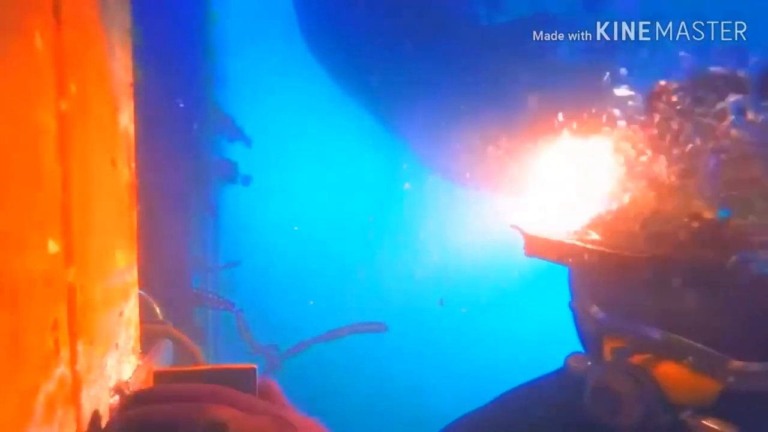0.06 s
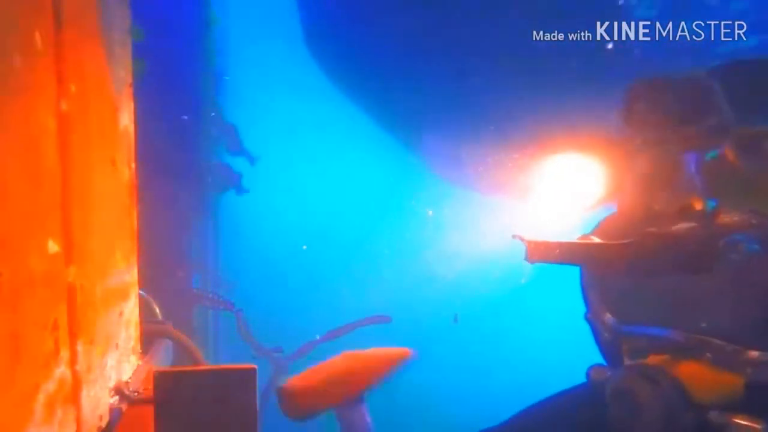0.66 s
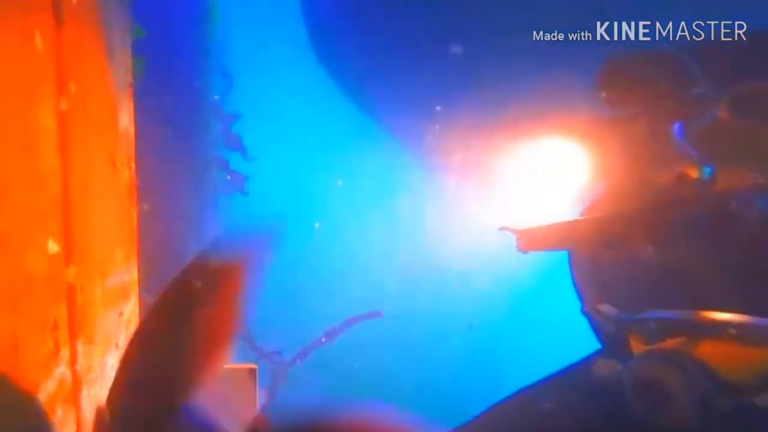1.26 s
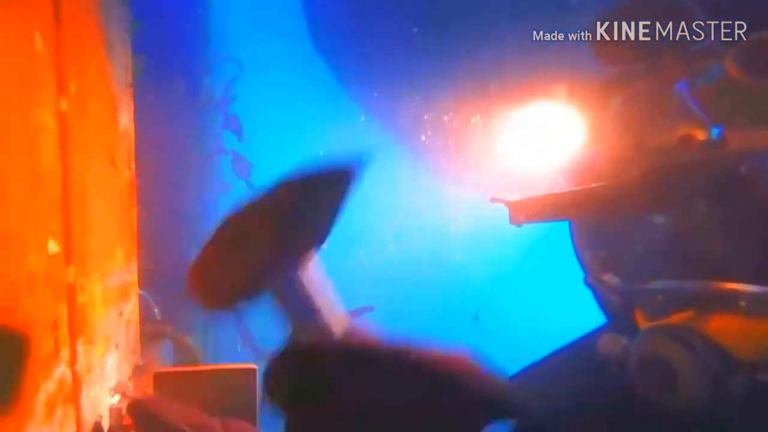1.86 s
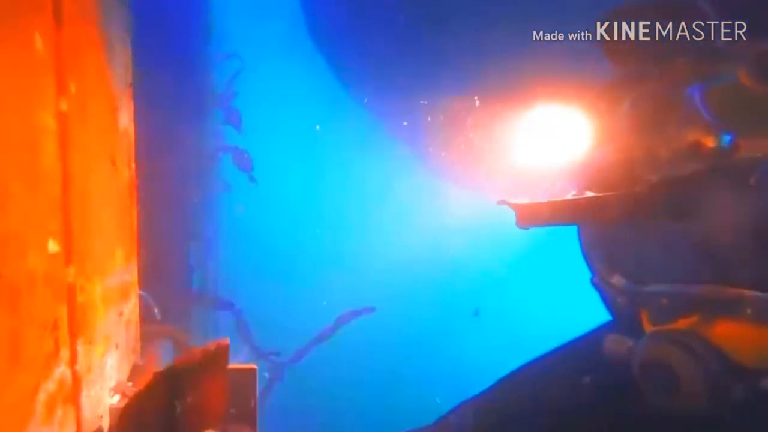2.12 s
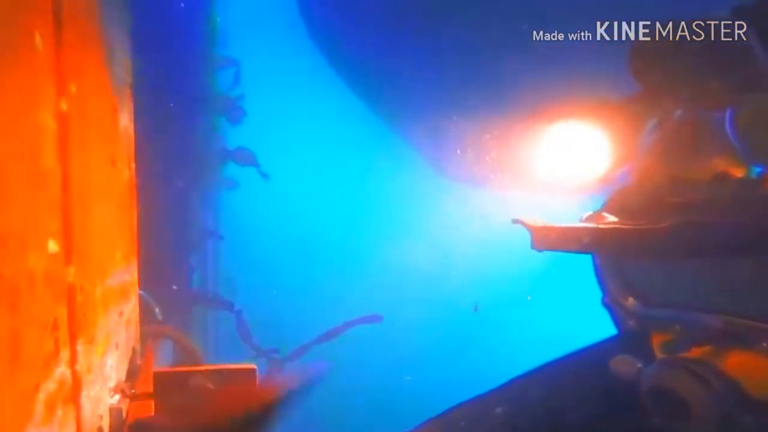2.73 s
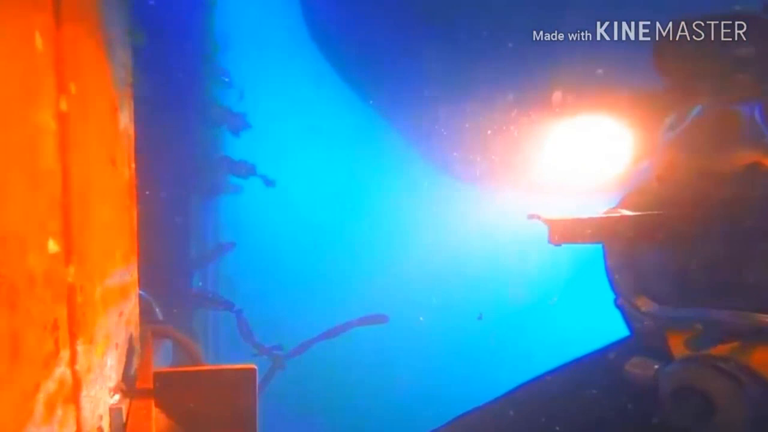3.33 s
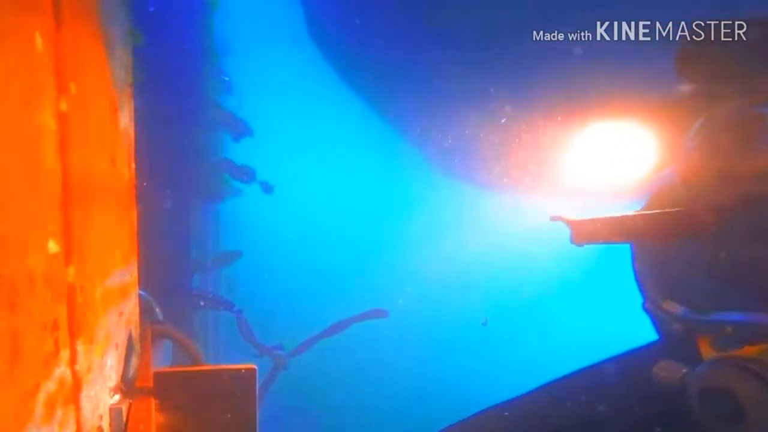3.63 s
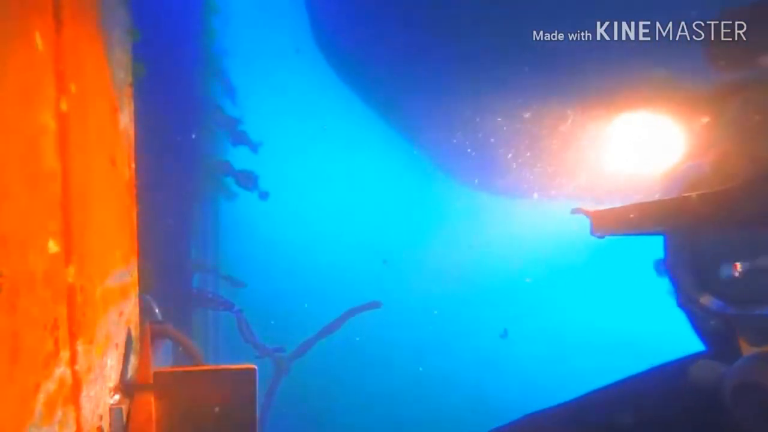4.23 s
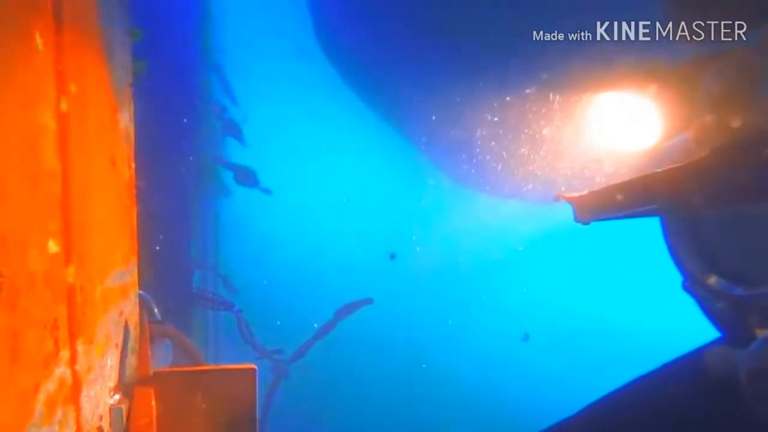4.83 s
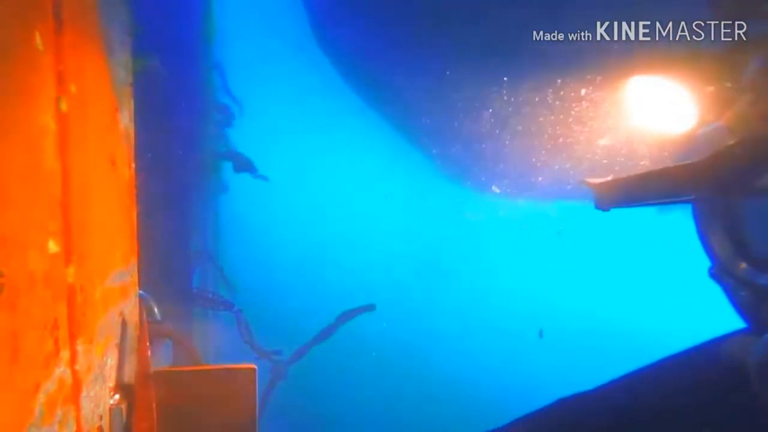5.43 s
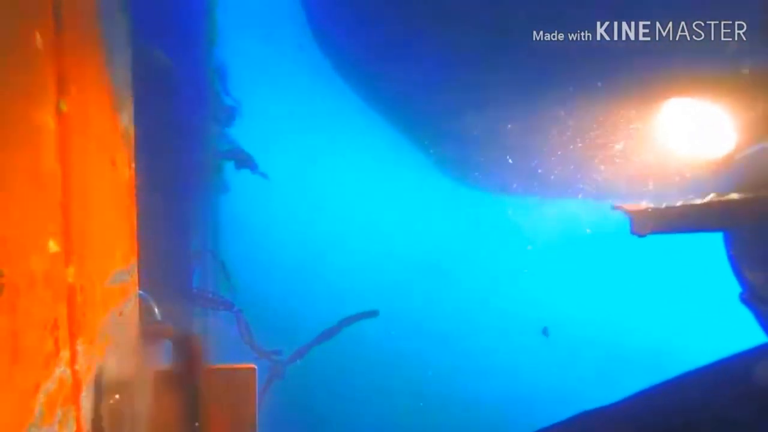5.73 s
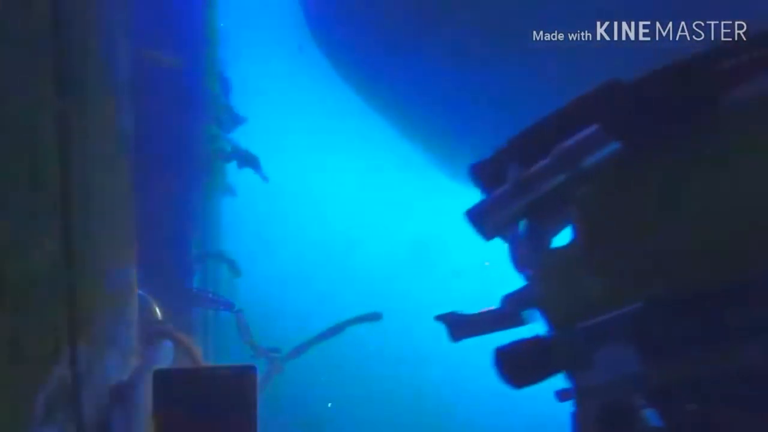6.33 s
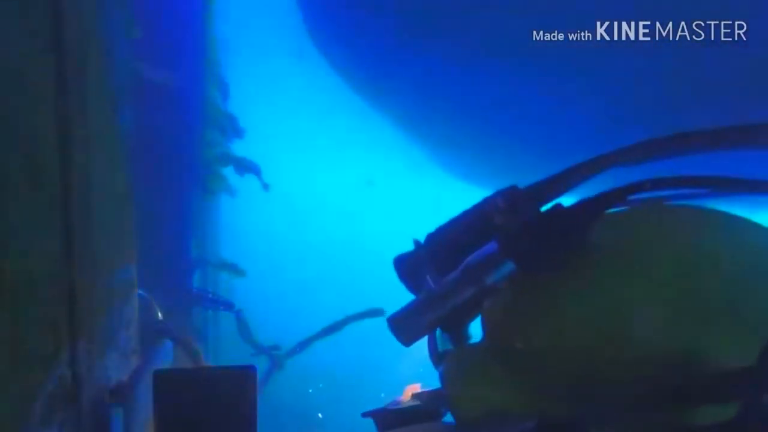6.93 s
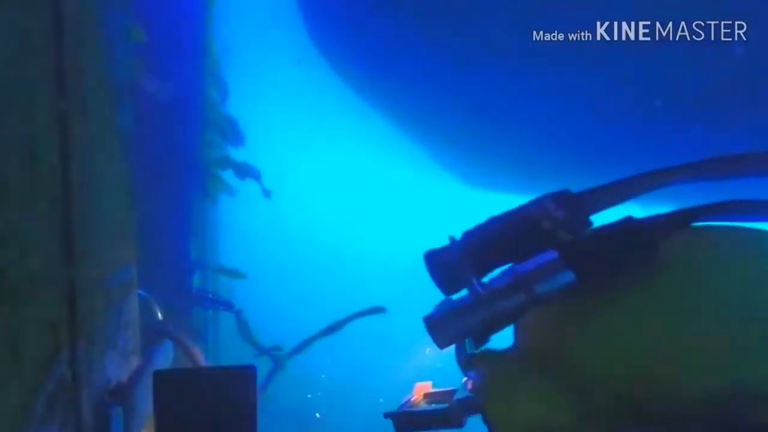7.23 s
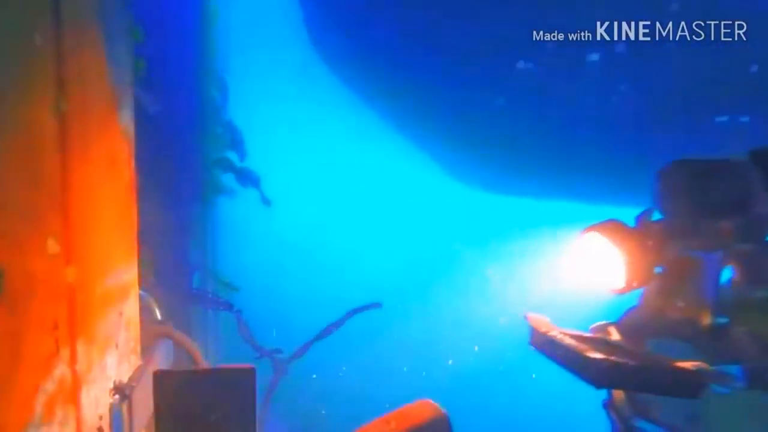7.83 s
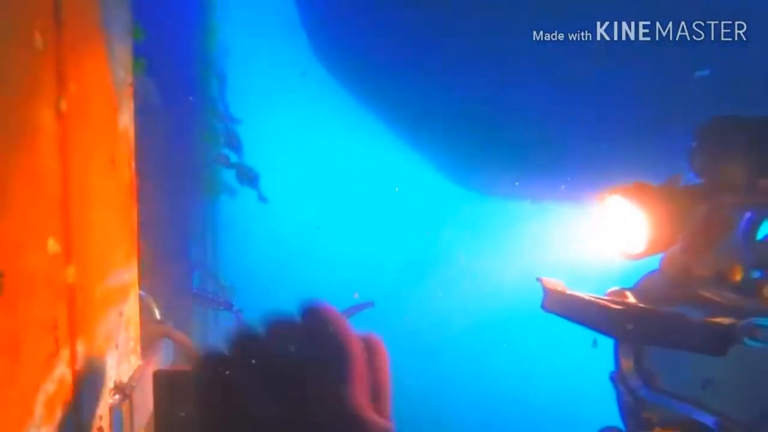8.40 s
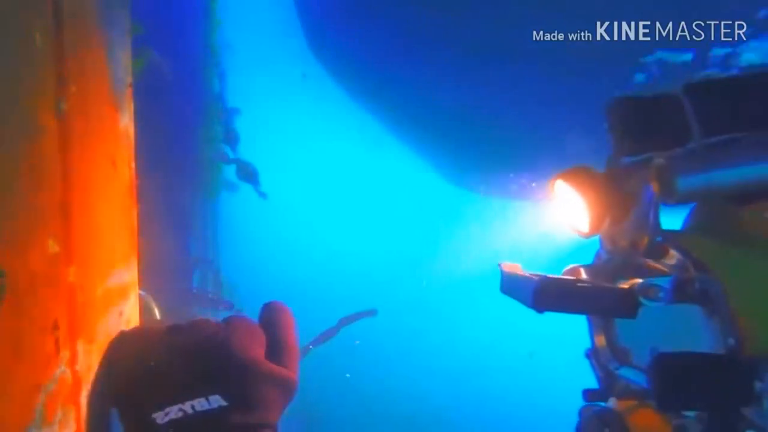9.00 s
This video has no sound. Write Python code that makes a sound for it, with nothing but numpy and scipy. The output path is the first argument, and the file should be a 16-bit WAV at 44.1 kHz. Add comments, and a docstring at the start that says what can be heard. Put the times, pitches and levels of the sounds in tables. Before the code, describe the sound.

A steady run of twelve hard hammer blows on steel cracks through the water, following an opening rush of bubbles and a light clunk. The blows overload a microphone inside a housing and push down the background of gurgling and engine hum. When the hammering stops, single bubbles and small wet spurts come forward, then another gush of gas and the clank of a steel tool bouncing on a bench.

```python
"""Gas gushes out under water beside a welder: its bubbles ring, gurgle and fizz, then die away.
A generator hums through the water. A tool clunks, and a hammer strikes steel twelve times, now and
then rebounding. Later come two thin squeaks, and a steel tool is dropped on the bench.
All is heard through a camera housing. Hard blows overload the input and pull the gain (the volume
setting) down, and it creeps back up."""
import sys
import numpy as np
from scipy import signal
from scipy.fft import rfft, irfft, next_fast_len
from scipy.io import wavfile

SR = 44100
rng = np.random.default_rng(int(sys.argv[2]) if len(sys.argv) > 2 else 0)


def unload_wav(signal):
    """Save mono or channel-first audio to the path in sys.argv[1] as 16-bit WAV at rate SR, clipped to [-1, 1]."""
    wavfile.write(
        sys.argv[1],
        SR,
        np.round(np.clip(np.atleast_2d(signal).T, -1, 1) * 32767).astype(np.int16),
    )


N = 399546
TIME = np.arange(N) / SR

# Gushes of gas. Each row: start in seconds, hold in seconds, relative levels of churn, gurgle and fizz
# in dB, fading of the fizz in dB per second.
GAS_GUSHES = [(-.15,0.093,-27.5,-30,-50,21),(0.805,.3,-58,-45,-60,21.5),(1.72,.35,-58.5,-54.5,-56,41),(4.021,.2,-21.5,-28,-50,6),(5.926,0.06,-72,-45.5,-58,4.5),(6.452,0.16,-55,-43.5,-75.5,12.5),(7.837,.2,-27,-35,-53.5,10.5)]
# The loudest single bubbles, and two low thumps near hammer blows (at 3.96 s and 5.619 s). Each row: start in
# seconds, pitch in Hz, level in dB, glide in octaves per second.
GLUGS_AND_THUMPS = [(.104,678,-15.5,1.5),(.111,464,-17,-0.5),(.135,818,-15.5,2.5),(.191,460,-16.5,4),(.548,242.6,-14.5,0.5),(.775,820,-27.5,2),(.856,760,-22,1.5),(1.21,341,-20.5,3),(1.648,424,-23,0),(2.474,805,-25.5,-3),(3.96,41.76,-11.5,2.5),(4.01,124.4,-15,7.5),(4.048,109.8,-20.5,7),(4.248,89.2,-9,3.5),(4.3,377,-18.5,-1.5),(4.99,156,-6,3),(5.002,220,-11,7.5),(5.379,238,-18.5,4.5),(5.486,259,-22.5,3.5),(5.619,191.4,-9,1),(6.319,820,-22.5,4),(6.352,730,-23,5),(6.516,259,-27,3),(6.59,617,-25,-0.5),(6.61,707,-21.5,5),(6.74,732,-24.5,4.5),(6.835,264,-17.5,3.5),(6.835,679,-15,1),(7.103,537,-31.5,0.5),(7.586,584,-24,4.5),(7.97,113,-9.5,3.5),(7.982,707,-22.5,1.5),(8.05,124.6,-6.5,6),(8.13,178,-13.5,3),(8.135,849,-14.5,4.5),(8.137,103,-7,1),(8.222,788,-19.5,0),(8.223,575,-27,1),(8.325,556,-23.5,-4),(8.531,857,-20,0),(8.603,544,-14,0.5),(8.907,768,-12,5.5),(8.909,459,-9,3.5)]
# The generator's tones. Each row: multiple of its turning rate, relative level in dB.
ENGINE_TONES = [(1,-8),(2,-4),(3,-5),(4,-1),(5,-17.5),(6,-11.5),(7,-15.5),(8,-21),(9,-28.5),(10,-24)]
# The whine of the electronics. Each row: pitch in Hz, level in dB.
WHINE_TONES = [(6199,-82.5),(9298,-82),(12398,-76),(15473,-77)]
# A tool bounces as it is taken up. Each row: start in seconds, then force, hardness and ring in dB.
TOOL_CLUNKS = [(0.3881,-4,-5,-2),(0.4614,-13.5,-8,-3.5)]
# Spurts of gas. Each row: start in seconds, middle pitch in Hz, bubble level in dB, splash level in dB.
GAS_SPURTS = [(1.387,3630,-44,-47),(2.187,2100,-42,-46),(2.804,1720,-49.5,-54),(3.209,1590,-55,-56),(4.271,1584,-30,-41),(4.584,1540,-35.5,-49),(4.611,4280,-45,-59.5),(6.023,3627,-55,-35),(6.06,2800,-63,-40),(6.125,4350,-30,-33),(6.166,4360,-42,-38),(6.276,3794,-44,-36.5),(6.512,1603,-43,-41),(6.55,2530,-58,-43),(7.585,2740,-40.5,-55),(7.915,1560,-45,-44),(7.976,3040,-49.5,-44.5),(8.003,2900,-46,-42),(8.047,4240,-43,-39.5),(8.097,1710,-43.5,-47),(8.134,1500,-40.5,-42),(8.145,4070,-42.5,-47),(8.22,1570,-41,-60),(8.285,2700,-36,-44),(8.305,2550,-38.5,-52),(8.324,3500,-48.5,-46.5),(8.401,4340,-42.5,-47.5),(8.452,4340,-46.5,-53),(8.575,2900,-48,-46.5),(8.603,1610,-35,-47),(8.611,3000,-50,-49)]
# Hammer on steel. Each row: start in seconds, then force, hardness and plate ring in dB, and the dB
# by which the spot that is hit favours every other tone.
HAMMER_BLOWS = [(1.4405,1.5,2.5,-26.5,-1),(1.8448,12,3,-19.5,3),(2.2321,13.5,1.5,-21.5,0),(2.5986,14.5,-15,-15.5,1.5),(2.9619,16,-6,-19,-3),(3.315,16.5,-7,-16.5,0.5),(3.672,12.5,3,-23.5,4),(4.0737,14,-2.5,-23,2.5),(4.4361,13,0.5,-27.5,0.5),(4.8471,14.5,-4,-27.5,-1),(5.2332,16,-4.5,-22.5,-1),(5.6163,14,-14.5,-23.5,1)]
# The hammer falls back. Each row: start in seconds, force in dB, ring of the shaken bubbles in dB, ring pitch
# in Hz.
HAMMER_REBOUNDS = [(2.606,-8,-0.5,2090),(3.347,-16.5,-14,1597),(3.378,-20,-21,1560),(3.7015,-1,-14,1830),(4.093,1.5,-10.5,1935)]
# A steel tool hits the bench. Each row: start in seconds, then force, hardness and tool ring in dB,
# share of the ring time, pitch ratio, plate ring in dB.
BENCH_KNOCKS = [(6.318,-15,-13,-62,0.23,1,-48),(8.532,-18,-28.5,-50,0.32,0.97,-49.5),(8.653,4,-4.5,0,0.99,1.023,-24),(8.7897,11.5,-3.5,1,0.22,0.96,-19.5),(8.8275,6,-34,-7.5,0.63,1.04,-22),(8.843,0.5,-36.5,-25,.3,1.04,-33)]
# Squeaks. Each row: start in seconds, starting pitch in Hz, level in dB.
THIN_SQUEAKS = [(7.35,2330,-56.5),(7.39,1830,-50.5)]
# The tones in a squeak. Each row: multiple of the pitch, relative level in dB.
SQUEAK_TONES = [(1,0),(1.42,-3),(1.78,-8)]

# Modes are the tones a thing rings with when hit. Each row: pitch in Hz, relative level in dB,
# ring time in seconds (t60, the time to fade by 60 dB).
HANDLE_MODES = [(254,-6,0.17),(514,-13.5,0.066),(818,-5,0.14),(1710,-20.5,0.066),(2030,-15.5,0.069),(2902,4.5,0.035)]
HOUSING_MODES = [(174,-13.5,0.086),(660,-29,0.0018),(820,-2.5,0.021),(1663,-10,0.023),(2390,-28,0.018),(2764,-6,0.0095),(2990,-9,0.013),(4250,-10.5,0.0069),(6340,-26.5,0.0073),(8100,-19,0.0043),(10580,-20.5,0.008)]
PLATE_MODES = [(368,-10,0.24),(484,-8,0.28),(617,-28.5,1),(739,-2.5,.42),(841,0.5,0.27),(815,-8,0.22),(1500,-12.5,.06),(1990,-2,0.056)]
TOOL_MODES = [(175.3,-0.5,0.36),(486,-13.5,0.66),(664,-10.5,0.16),(952,-14,0.11),(1466,-9.5,0.12),(1880,-16,.06),(2014,-6.5,0.14),(2280,-10,.06),(2740,-8,0.066),(3080,-11,.06),(4680,-25,.05)]
# The tones of bubbles shaken loose by a blow. Each row: multiple of the ring pitch, relative level in dB, ring
# time in seconds.
SHAKEN_MODES = [(.75,-14,0.051),(.91,-15,.055),(1,-2,0.064),(1.04,-8,0.032),(1.12,-13.5,.06),(1.25,-13.5,0.056),(1.6,-27,.06)]

# A colour says how strong a sound is from bass to treble. Each row: frequency in Hz, relative level in dB.
CHURN_COLOUR = [(15,-17),(28,-1.5),(60,0),(100,8.5),(150,-1),(220,-19),(330,-22.5),(600,-86),(3000,-90.5)]  # big gas pockets
GURGLE_COLOUR = [(120,-13),(250,-6),(380,-8),(600,-3),(840,0),(950,-12),(1100,-30),(1400,-27.5),(5000,-55.5),(15000,-80.5)]  # middling bubbles
FIZZ_COLOUR = [(700,-10),(1000,-3),(1300,-10),(1620,1),(2100,-4),(2750,1),(3600,-6),(4300,-4),(4900,-21),(8000,-26),(12000,-31),(15000,-48)]  # tiny bubbles
HISS_COLOUR = [(300,0),(2000,4),(4000,6),(6300,3),(8000,-1),(12000,-3),(14000,-13),(16000,-26)]  # the electronics
CRACKLE_COLOUR = [(1000,-9.5),(4000,5),(10500,-2),(13000,-4),(16000,-10)]  # crackle after a shock
WASH_COLOUR = [(80,-8),(300,1.5),(800,10),(1200,-6),(1700,-1),(2400,-2.5),(3700,-18.5),(4700,-25),(9000,-39.5),(15000,-51.5)]  # shaken water
ECHO_COLOUR = [(400,-7.5),(800,0.5),(1200,-8.5),(1650,0.5),(2200,-2),(2900,-3),(3800,-13.5),(4800,-24),(9000,-33),(15000,-55)]  # echoes off the walls
RUMBLE_COLOUR = [(70,-12.5),(170,0),(260,3),(380,-3),(520,-3),(900,-19),(2000,-43.5),(6000,-74),(15000,-100)]  # the basin after a blow
SPLASH_COLOUR = [(400,-4),(850,6),(1250,-7),(1620,3),(2100,-2),(2750,1),(3600,-5),(4400,-4),(4900,-22),(8000,-23),(11500,-22),(15000,-40)]  # a spurt's splash


def from_db(db):
    """Turn decibels into a number to multiply by."""
    return 10 ** (np.asarray(db) / 20)


def rms_one(x):
    """Scale a sound to an average power of 1."""
    return x / np.sqrt(np.mean(x ** 2) + 1e-20)


def add(out, start_s, sound):
    """Mix a sound in at its start time."""
    at = int(np.clip(round(start_s * SR), 0, len(out) - 1))
    out[at:at + len(sound)] += sound[:len(out) - at]


def colour(x, points):
    """Shape the bass and treble of a sound; its power comes out as 1."""
    hz, db = np.transpose(points)
    bins = np.maximum(np.fft.rfftfreq(len(x), 1 / SR), 1)
    gains = from_db(np.interp(np.log(bins), np.log(hz), db))
    return rms_one(irfft(rfft(x) * gains, len(x)))


def noise(points):
    """Steady noise of the given colour."""
    return colour(rng.standard_normal(next_fast_len(N)), points)[:N]


def drift(per_s, length=N):
    """A random wander of about 1 either way, turning per_s times a second."""
    return np.interp(TIME[:length] * per_s, np.arange(4096), rng.standard_normal(4096))


def flow(levels_db, fade_db_per_s, trickle_db):
    """Strength of the gas: each gush swells, holds and dies away over a trickle, all surging a little."""
    attack_s = .062
    power = from_db(trickle_db) ** 2
    fades = np.broadcast_to(fade_db_per_s, len(GAS_GUSHES))
    for (start, hold, *_), db, fade in zip(GAS_GUSHES, levels_db, fades):
        swell = np.clip((TIME - start) / attack_s, 0, 1)
        fading_s = np.maximum(TIME - start - attack_s - hold, 0)
        power = power + (swell * from_db(db - fade * fading_s)) ** 2
    return np.sqrt(power) * from_db(3.5 * drift(per_s=9))


def bubble(hz, t60, rise, swell=.97):
    """Gas pinches off over about `swell` cycles, rings, and glides by `rise` octaves a second."""
    t = TIME[:int(t60 * SR) + 2]
    phase = 2 * np.pi * np.cumsum(hz * 2 ** (rise * t)) / SR
    return np.sin(phase) * from_db(-60 * t / t60) * (1 - np.exp(-2 * t * hz / swell))


def swarm(count, low_hz, high_hz, cycles, spread_db, climb):
    """Bubbles of random size and timing; on average each rises `climb` octaves while it lasts."""
    out = np.zeros(next_fast_len(N))
    for when, size, strength, life, speed in rng.random((count, 5)):
        hz = low_hz * (high_hz / low_hz) ** size
        t60 = cycles * (.5 + life) / hz
        level = from_db(spread_db * min(-np.log(strength + 1e-9), 3.5))
        add(out, when * N / SR, level * bubble(hz, t60, rise=2 * speed * climb / t60))
    return out


def pops(fizz):
    """Gas pockets snap open, more often and more loudly as the fizz grows."""
    out = np.zeros(N)
    pops_per_s = 55 * fizz / from_db(-52)
    starts = np.flatnonzero(rng.random(N) < pops_per_s / SR)
    for at, (size, weakness) in zip(starts, rng.random((len(starts), 2))):
        snap = sum(bubble(hz * 2.4 ** size, t60=.018, rise=0, swell=3) for hz in (1400, 1600, 1800))
        add(out, at / SR, fizz[at] * from_db(12 - 10 * weakness) * snap)
    return out


def gas():
    """Big pockets churn and fade quickly, middling bubbles gurgle, tiny ones fizz and snap."""
    _, _, churn_db, gurgle_db, fizz_db, fizz_fade = np.transpose(GAS_GUSHES)
    churn = flow(churn_db, fade_db_per_s=36, trickle_db=-39)
    gurgle = flow(gurgle_db, fade_db_per_s=11.5, trickle_db=-51)
    far_fizz = flow(fizz_db, fizz_fade, trickle_db=-59.5)
    near_fizz = flow(fizz_db, fizz_fade, trickle_db=-69)
    middling = swarm(count=2800, low_hz=170, high_hz=1100, cycles=32, spread_db=4, climb=.12)
    tiny = swarm(count=2600, low_hz=1000, high_hz=4800, cycles=40, spread_db=5.5, climb=.04)
    out = churn * from_db(-3.5) * noise(CHURN_COLOUR)
    # Near bubbles are heard one by one; far ones merge into a rush of noise.
    out += gurgle * from_db(-1) * (colour(middling, GURGLE_COLOUR)[:N] + .55 * noise(GURGLE_COLOUR))
    flutter = from_db(3 * drift(per_s=30))
    out += near_fizz * flutter * from_db(-3.5) * colour(tiny, FIZZ_COLOUR)[:N]
    out += far_fizz * from_db(-8) * noise(FIZZ_COLOUR)
    return out + pops(near_fizz)


def generator():
    """The hum of a slightly unsteady engine carries through the water."""
    turns_per_s = 25.66 * (1 + .0057 * drift(per_s=5.8))
    turns = np.cumsum(turns_per_s) / SR
    hum = np.zeros(N)
    for multiple, db in ENGINE_TONES:
        level = from_db(db + 1.2 * drift(per_s=13))
        hum += level * np.sin(2 * np.pi * (multiple * turns + rng.random()))
    return np.sqrt(2) * from_db(-36.5) * hum


def electronics():
    """The microphone input adds a faint hiss and a thin, unsteady whine."""
    whine = sum(from_db(db) * np.sin(2 * np.pi * hz * TIME + .9 * drift(per_s=300))
                for hz, db in WHINE_TONES)
    return np.sqrt(2) * whine + from_db(-70) * noise(HISS_COLOUR)


def glugs():
    """Loud single bubbles, and two low thumps near hammer blows: lower ones ring longer, and each wobbles as it
    glides."""
    out = np.zeros(N)
    for start, hz, db, glide in GLUGS_AND_THUMPS:
        size = 500 / hz
        glug = bubble(hz, t60=.12 * size ** .49, rise=glide, swell=3.4)
        wobble_db = 2.2 * drift(per_s=160, length=len(glug))
        add(out, start, from_db(db + wobble_db) * glug)
    return out


def ring(x, hz, t60):
    """One mode: each click in x sets off a pure tone that dies away."""
    decay, angle = from_db(-60 / (t60 * SR)), 2 * np.pi * hz / SR
    return signal.lfilter([0, np.sin(angle)], [1, -2 * decay * np.cos(angle), decay ** 2], x + 1e-18)


def struck(modes, ring_db, swell_s, spot_db=0, pitch=1, lasts=1):
    """Steel rings; the spot hit favours odd or even modes, and the restless water makes each waver."""
    t = TIME[:SR]
    click, out = 1.0 * (t == 0), 0
    for k, (hz, db, t60) in enumerate(modes):
        waver_db = 2.2 * drift(per_s=45, length=SR)
        level_db = ring_db + db + spot_db * (-1) ** k + rng.standard_normal()
        out = out + from_db(level_db + waver_db) * ring(click, hz * pitch, t60 * lasts)
    return out * (1 - np.exp(-(t / swell_s) ** 2))


def housing(shock, hard_db):
    """A shock rings the camera housing; a hard hit favours its stiff modes, differently each time."""
    out = 0
    for (hz, db, t60), chance in zip(HOUSING_MODES, rng.standard_normal(len(HOUSING_MODES))):
        stiff = np.exp(-np.log(hz / 2900) ** 2 / .3)
        level = from_db(db + stiff * (hard_db + 2.5 * chance))
        out = out + level * ring(shock, hz * np.exp(.045 * stiff * chance), t60)
    return out


def backwash(t):
    """After a shock the water hisses briefly, and the bubbles shaken loose rattle."""
    hiss = rng.standard_normal(len(t)) * swell_and_fade(t, swell_s=.0006, fade_s=.012)
    rattle = np.zeros(len(t))
    for size, when in rng.random((12, 2)):
        add(rattle, .012 * when ** 2, bubble(1300 * 3 ** size, t60=.045, rise=.5))
    fade_out = np.cos(np.pi / 2 * t / t[-1]) ** 2
    return colour(rms_one(hiss) + .9 * rms_one(rattle), WASH_COLOUR) * fade_out


def swell_and_fade(t, swell_s, fade_s):
    """The loudness of a short burst: a quick rise, then a slower fall."""
    return (1 - np.exp(-t / swell_s)) * np.exp(-t / fade_s)


def echoes(per_s=320):
    """A shock comes back off the walls as a rough patter."""
    t = TIME[:SR // 3]
    patter = rng.standard_normal(len(t)) * (rng.random(len(t)) < per_s / SR)
    return colour(patter, ECHO_COLOUR) * swell_and_fade(t, swell_s=.004, fade_s=.024)


def rumble():
    """After a blow the bass lingers between the walls of the basin."""
    t = TIME[:SR // 2]
    bass = colour(rng.standard_normal(len(t)), RUMBLE_COLOUR)
    return bass * swell_and_fade(t, swell_s=.012, fade_s=.05)


def strikes(blows, bass_hz, contact_hz, crack_db, crack_s, wash_db, echo_db, rumble_db):
    """Each hit sends a shock into the housing, rings the steel and washes round the basin."""
    out, t = np.zeros(N), TIME[:8192]
    # So small a source gives the water little bass.
    cut_bass = signal.butter(2, bass_hz, "high", fs=SR, output="sos")
    for start, force_db, hard_db, steel in blows:
        crackle = colour(rng.standard_normal(len(t)), CRACKLE_COLOUR) * np.exp(-t / crack_s)
        shock = signal.sosfilt(cut_bass, (t == 0) + .03 * crackle)
        shell = from_db(crack_db + .094 * hard_db) * crackle + housing(shock, hard_db)
        wash = from_db(wash_db + .091 * hard_db) * backwash(t)
        # A gentle contact lasts longer, so it sounds duller.
        edge_hz = np.clip(contact_hz * from_db(.65 * force_db), 500, .44 * SR)
        soften = signal.butter(2, edge_hz, fs=SR, output="sos")
        knock = signal.sosfilt(soften, signal.sosfilt(soften, shell + wash))
        add(out, start, -from_db(force_db) * knock)
        add(out, start, signal.sosfilt(soften, steel))
        add(out, start, from_db(force_db + echo_db) * echoes())
        add(out, start, from_db(force_db + rumble_db) * rumble())
    return out


def clunks():
    """A tool bounces as it is taken up, and its handle rings."""
    blows = [(start, force, hard, struck(HANDLE_MODES, db, swell_s=.00079))
             for start, force, hard, db in TOOL_CLUNKS]
    return strikes(blows, bass_hz=313, contact_hz=2800, crack_db=-37, crack_s=.002,
                   wash_db=-28, echo_db=-39.5, rumble_db=-43.5)


def spurts():
    """Gas spurts out with a wet splash and eight tiny bubbles, close in time and pitch."""
    out, t = np.zeros(N), TIME[:8192]
    spread_octaves, top_hz = .14, 4500
    for start, hz, db, splash_db in GAS_SPURTS:
        grains = rng.standard_normal(len(t)) * (rng.random(len(t)) < .06)
        splash = colour(grains, SPLASH_COLOUR) * swell_and_fade(t, swell_s=.001, fade_s=.009)
        add(out, start, from_db(splash_db) * splash)
        for delay, size, strength in rng.standard_normal((8, 3)):
            # Pitches too high to be heard through the wall are folded back down.
            pitch = top_hz - abs(top_hz - hz * 2 ** (spread_octaves * size))
            pip = bubble(pitch, t60=45 / pitch, rise=2, swell=5)
            add(out, start + .005 * abs(delay), from_db(db + 2.5 * strength) * pip)
    return out


def hammer():
    """Hammer blows set a steel plate ringing."""
    blows = [(start, force, hard, struck(PLATE_MODES, db, swell_s=.02, spot_db=spot))
             for start, force, hard, db, spot in HAMMER_BLOWS]
    return strikes(blows, bass_hz=537, contact_hz=8400, crack_db=-18, crack_s=.002,
                   wash_db=-42.5, echo_db=-43.5, rumble_db=-40.5)


def rebounds(hard_db=-10):
    """Now and then a soft knock follows a blow, and bubbles shaken loose ring out in a cluster."""
    blows = [(start, force, hard_db, struck(SHAKEN_MODES, db, swell_s=.0001, pitch=hz))
             for start, force, db, hz in HAMMER_REBOUNDS]
    return strikes(blows, bass_hz=356, contact_hz=3500, crack_db=-17.5, crack_s=.0016,
                   wash_db=-33.5, echo_db=-39.5, rumble_db=-49)


def knocks():
    """A steel tool hits the bench and rings with the plate; landing again cuts the tool's ring short."""
    gaps_s = np.diff([row[0] for row in BENCH_KNOCKS], append=N / SR)
    blows = []
    for (start, force, hard, db, share, pitch, plate_db), gap_s in zip(BENCH_KNOCKS, gaps_s):
        tool = struck(TOOL_MODES, db, swell_s=.0022, pitch=pitch, lasts=share)
        choke = np.exp(-np.maximum(TIME[:len(tool)] - gap_s, 0) / .008)
        plate = struck(PLATE_MODES, plate_db, swell_s=.004)
        blows.append((start, force, hard, tool * choke + plate))
    return strikes(blows, bass_hz=146.4, contact_hz=4237, crack_db=-28.5, crack_s=.005,
                   wash_db=-37.5, echo_db=-47, rumble_db=-35)


def squeaks():
    """A thin, slightly rough squeak swells and fades as it slides upwards."""
    length_s, octaves_per_s = .048, 5
    out, t = np.zeros(N), TIME[:int(length_s * SR)]
    for start, hz, db in THIN_SQUEAKS:
        pitch = hz * 2 ** (octaves_per_s * t + .012 * drift(per_s=400, length=len(t)))
        phase = 2 * np.pi * np.cumsum(pitch) / SR
        tone = sum(from_db(level) * np.sin(multiple * phase) for multiple, level in SQUEAK_TONES)
        add(out, start, from_db(db) * tone * np.sin(np.pi * t / length_s))
    return out


def scene():
    """Everything that reaches the one microphone."""
    bubbles = gas() + glugs() + spurts()
    tools = clunks() + hammer() + rebounds() + knocks()
    return (bubbles + tools + squeaks() + generator() + electronics())[None]


def gain_control(x, threshold_db, depth_db, start_db, lag_s, attack_s, release_db_per_s):
    """Peaks over the threshold pull the gain down after a short lag; it climbs back slowly."""
    over_db = np.maximum(20 * np.log10(np.abs(x[0]) + 1e-9) - threshold_db, 0)
    cut_db = depth_db * (1 - np.exp(-over_db / 3))  # all big overloads cut by nearly the same depth
    cut_db[0] = start_db  # the gain is still recovering from an earlier blow
    recovery_db = release_db_per_s * TIME
    held_db = np.maximum.accumulate(cut_db + recovery_db) - recovery_db
    late_db = np.interp(TIME - lag_s, TIME, held_db)
    smooth = np.exp(-1 / (attack_s * SR))
    return x * from_db(-signal.lfilter([1 - smooth], [1, -smooth], late_db))


def record(dry):
    """The gain drops too late for the start of a blow, which is squashed flat; the top treble is cut."""
    ducked = gain_control(dry, threshold_db=-5.5, depth_db=19, start_db=9.5,
                          lag_s=.0026, attack_s=.0011, release_db_per_s=21)
    ceiling, dull_hz, cutoff_hz = .57, 11500, 16000
    clipped = ducked / (1 + (ducked / ceiling) ** 6) ** (1 / 6)
    dulled = signal.sosfilt(signal.butter(2, dull_hz, fs=SR, output="sos"), clipped)
    return signal.sosfilt(signal.ellip(10, .3, 80, cutoff_hz, fs=SR, output="sos"), dulled)


dry = scene()
out = record(dry)
unload_wav(out)
```